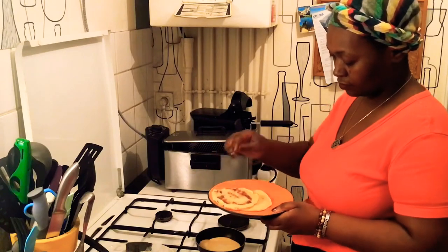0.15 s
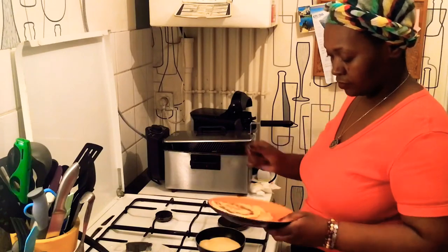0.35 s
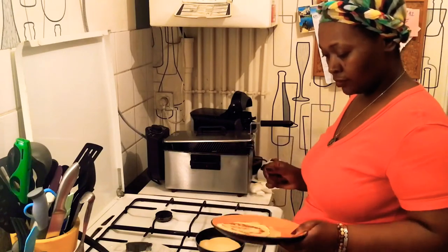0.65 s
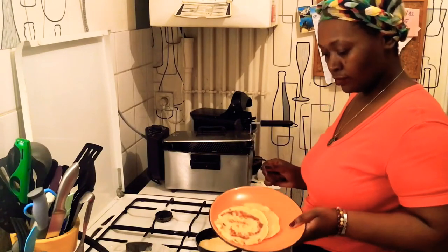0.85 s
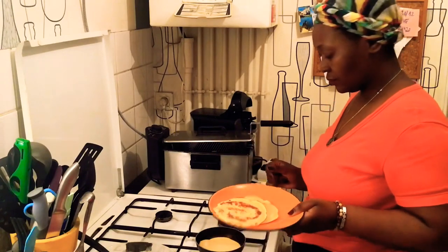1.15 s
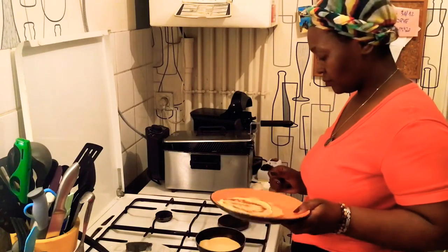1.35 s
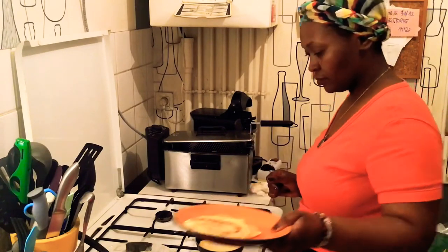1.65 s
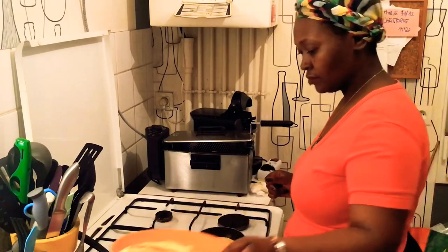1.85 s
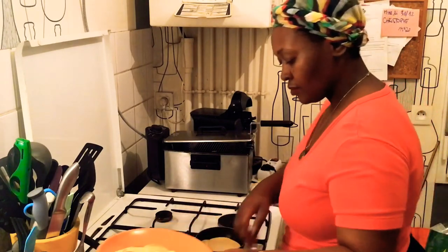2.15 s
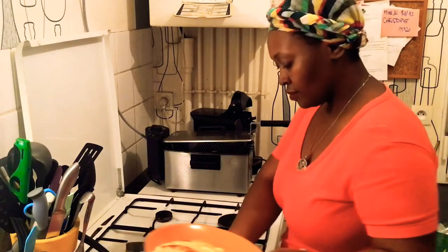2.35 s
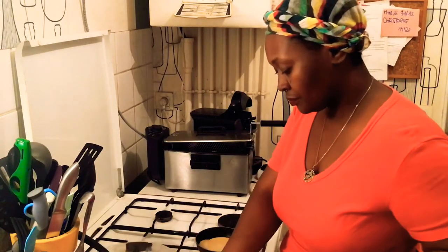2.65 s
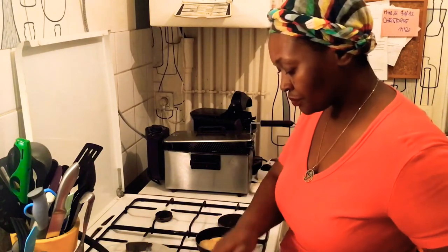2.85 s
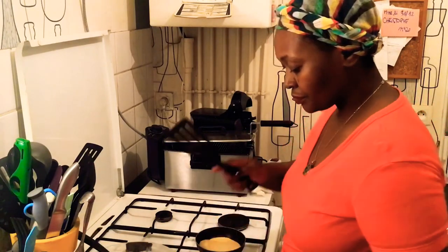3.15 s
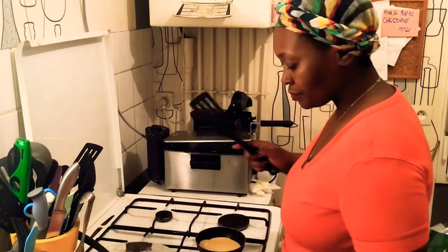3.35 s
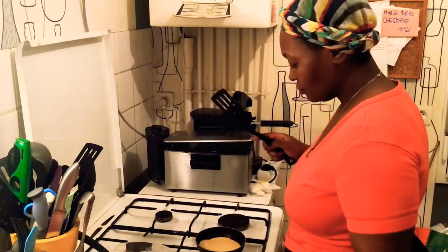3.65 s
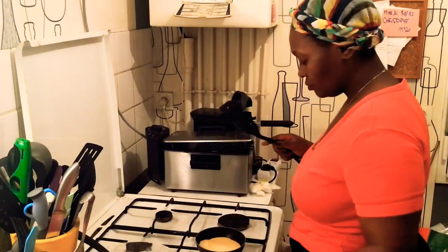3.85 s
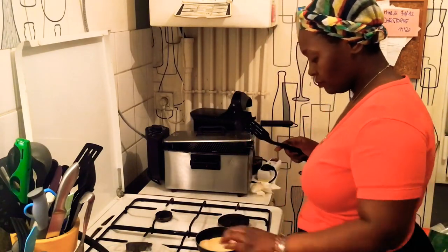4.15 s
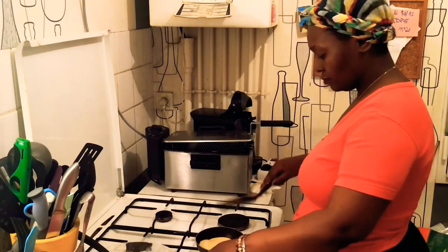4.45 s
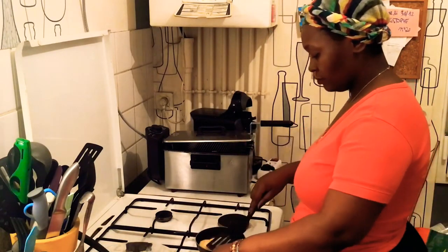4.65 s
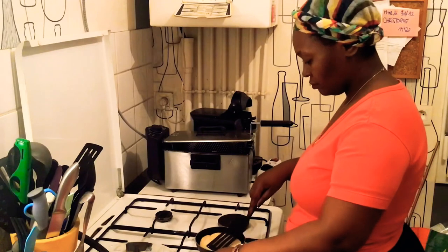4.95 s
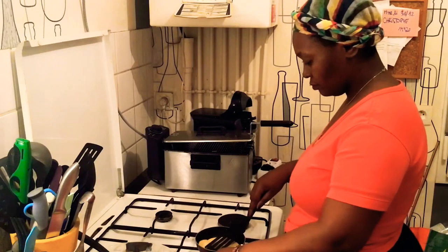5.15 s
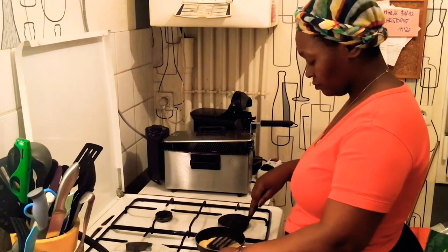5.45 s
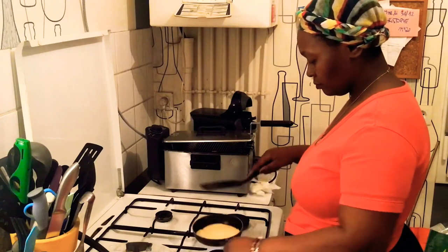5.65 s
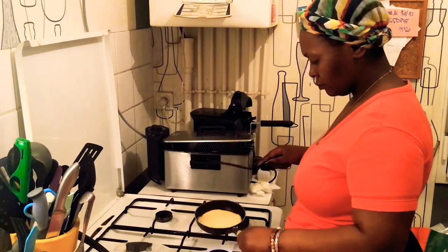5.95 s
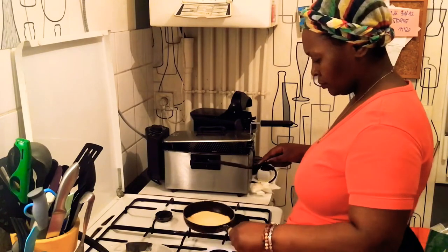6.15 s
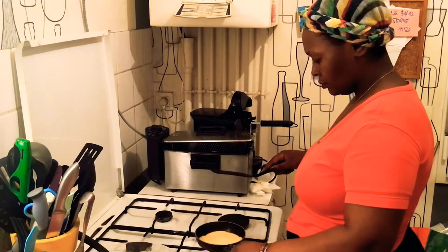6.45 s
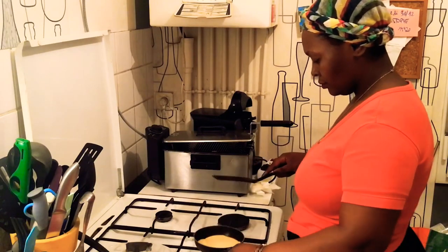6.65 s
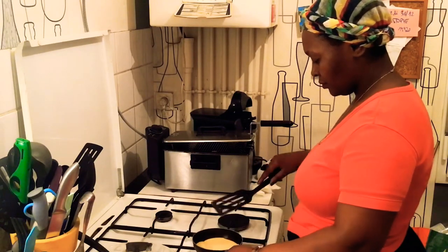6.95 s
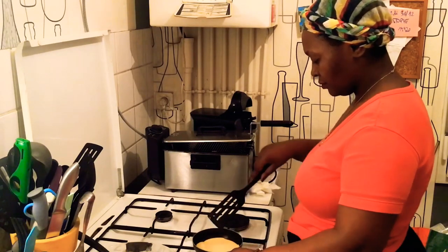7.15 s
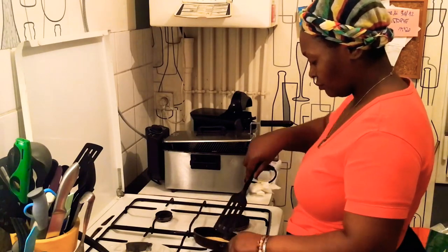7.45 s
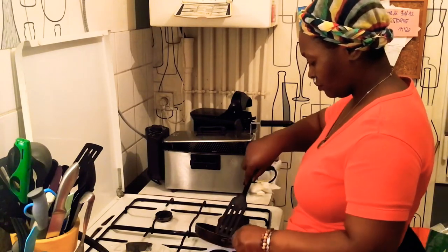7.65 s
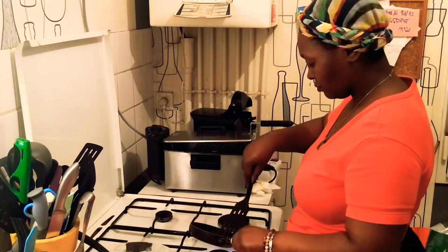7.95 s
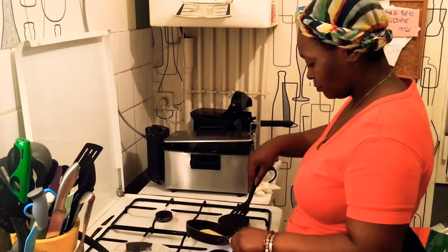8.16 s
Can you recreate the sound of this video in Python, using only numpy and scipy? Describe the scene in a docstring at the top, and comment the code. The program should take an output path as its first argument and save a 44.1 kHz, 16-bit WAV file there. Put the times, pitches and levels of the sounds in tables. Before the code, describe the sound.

Steady fan drone with soft airflow, faint sleeve rustles and tiny ticks, then dull plastic knocks and a single loud metallic clank on the hob.

```python
"""A small tiled kitchen: an extractor fan hums over a gas hob while someone makes pancakes.
The motor's magnetic pull, swayed by each turn of the rotor, gives a cluster of low tones over rushing air.
Sleeves brush, bracelets tick, a light piece of metal rings and soft bumps swell in the room: shaped noise
and fading tones. A plastic spatula knocks dully in the pan, and the pan is set down with one sharp clink,
heard as a crowd of ringing modes and a dense clank."""
import sys
import numpy as np
from scipy import signal
from scipy.fft import rfft, irfft
from scipy.io import wavfile
from scipy.ndimage import uniform_filter1d

SR = 44100
rng = np.random.default_rng(int(sys.argv[2]) if len(sys.argv) > 2 else 0)


def int16_out(signal):
    """Quantize to a 16-bit WAV file."""
    q = np.round(np.clip(np.atleast_2d(signal).T, -1, 1) * 32767)
    wavfile.write(sys.argv[1], SR, q.astype(np.int16))


N = 365588
TIME = np.arange(N) / SR  # the whole scene, s
RING = np.arange(SR) / SR  # one second for each struck sound, s


def undb(db):
    """Decibels to gain."""
    return 10 ** (np.asarray(db) / 20)


def unit(x):
    """Scale to an rms of 1."""
    return x / np.sqrt(np.mean(x ** 2))


def colour(x, points):
    """Filter by a spectrum of (pitch_hz, level_db) points, joined along log frequency."""
    point_hz, point_db = np.transpose(points)
    bin_hz = np.maximum(np.fft.rfftfreq(len(x), 1 / SR), 1)
    gain = undb(np.interp(np.log(bin_hz), np.log(point_hz), point_db))
    return irfft(rfft(x) * gain, len(x))


def walk(rate_hz):
    """Slow random drift: levels held for 1 / rate_hz seconds, slewed twice, with an rms of 1."""
    hold = int(SR / rate_hz)
    steps = np.repeat(rng.standard_normal(N // hold + 1), hold)
    slewed = uniform_filter1d(uniform_filter1d(steps, hold), hold)
    return unit(slewed[:N])


def soften(x, cutoff_hz, order):
    """Low-pass: a softer contact pushes for longer and excites less treble."""
    sos = signal.butter(order, min(cutoff_hz, .45 * SR), fs=SR, output="sos")
    return signal.sosfilt(sos, x)


def zero_phase_low(x, cutoff_hz):
    """The part of a sound below a cut-off, without delay, so that it can be subtracted cleanly."""
    return signal.sosfiltfilt(signal.butter(2, cutoff_hz, fs=SR, output="sos"), x)


def fade(t60_s):
    """Exponential decay over one second, falling 60 dB per t60_s."""
    return undb(-60 * RING / t60_s)


def ring(modes):
    """Sum of damped modes; each reaches the microphone with its own phase."""
    out = np.zeros(SR)
    for pitch_hz, level_db, t60_s in modes:
        tone = np.sin(2 * np.pi * (pitch_hz * RING + rng.random()))
        out += undb(level_db) * fade(t60_s) * tone
    return out


def add(track, start_s, sound):
    """Mix a sound into the track at its start time."""
    i = int(start_s * SR)
    track[i:i + len(sound)] += sound[:N - i]


def motor(drone_db=-0.08, throb_db=1.0, shiver_db=0.8, flutter_db=1.5, wobble_hz=0.1502):
    """Magnetic pull at twice the mains rate, with sidebands one rotor turn apart; the loudest throbs."""
    mains_pull_hz, drone_sideband = 100, 3
    # the quieter tones: pull_multiple, rotor_sideband
    sidebands = [(1, -1), (1, 0), (1, 1), (1, 2), (1, 4), (2, 1)]
    # middle level of each of those tones: level_db
    sideband_db = [-45.5, -63, -38.5, -49.5, -50, -49.5]
    # the loudest tone follows the rotor as its speed wanders: time_s, pitch_hz (before the wobble)
    drone_pitch = [(0.0, 165.8), (0.38, 163.4), (1.43, 166.2), (1.86, 162.7), (2.63, 166), (2.8, 163.1),
                   (3.25, 166.9), (3.63, 163.7), (3.76, 166.2), (4.36, 163.4), (4.57, 166.2), (4.74, 162.9),
                   (5.16, 166.9), (5.36, 163.5), (5.79, 166.7), (6.05, 163.4), (7.41, 165.3), (8.29, 165.0)]
    # slow swells of that tone: time_s, level_db (before the trim and drift)
    drone_level = [(0.0, -29.9), (1.81, -31), (2.08, -27.5), (2.79, -32.5), (2.95, -30), (4.08, -31.5),
                   (4.4, -26.5), (4.57, -32.5), (4.87, -27.5), (5.08, -31.4), (5.71, -29.5), (5.88, -33.5),
                   (6.18, -27.5), (6.6, -31), (6.77, -26.5), (7.03, -31), (8.16, -30), (8.29, -38)]

    pitch_hz = np.interp(TIME, *np.transpose(drone_pitch))
    rotor_hz = (pitch_hz - mains_pull_hz) / drone_sideband + wobble_hz * walk(8)
    turns = np.cumsum(rotor_hz) / SR  # shared, so that all sidebands keep step with the rotor

    def tone(pull, sideband):
        """One sideband of a multiple of the pull, at an rms of 1."""
        return np.sqrt(2) * np.sin(2 * np.pi * (pull * mains_pull_hz * TIME + sideband * turns))

    swell_db = np.interp(TIME, *np.transpose(drone_level))
    drift_db = throb_db * walk(8) + shiver_db * walk(22)
    out = undb(swell_db + drone_db + drift_db) * tone(1, drone_sideband)
    for (pull, sideband), level_db in zip(sidebands, sideband_db):
        out = out + undb(level_db + flutter_db * walk(5)) * tone(pull, sideband)
    return out


def air(swell_db=0.36, flicker_db=.5):
    """Turbulence booms in the duct and thins out into the hiss of fan and burner."""
    # the boom of hood and duct: pitch_hz, level_db (per Hz)
    rumble = [(25, -99), (38, -91), (50, -75), (60, -64.5), (72, -68), (100, -66.5), (116, -64),
              (140, -61.5), (178, -60.5), (200, -60.5), (235, -62), (275, -71), (308, -60.5), (345, -77)]
    # the rush above it: pitch_hz, level_db (per Hz)
    rush = [(345, -77), (410, -74.5), (520, -79), (650, -82.5), (820, -87.5), (900, -84.5), (1080, -93.5),
            (1320, -90), (1700, -96), (2150, -93.5), (3000, -101)]
    # the hiss on top: pitch_hz, level_db (per Hz)
    hiss = [(3000, -101), (4100, -102.5), (5500, -100.5), (6600, -109), (7350, -104), (7900, -109),
            (8600, -106), (10200, -111), (15500, -113)]
    white = rng.standard_normal(N) * np.sqrt(SR / 2)  # unit power in each Hz
    flow = colour(white, rumble + rush[1:] + hiss[1:])  # each band starts where the last one ends
    return flow * undb(swell_db * walk(4.17) + flicker_db * walk(18))


def rustle(grain_db=2, swell_power=3):
    """Cloth rubs in uneven little slips; each movement swells, holds briefly and dies away."""
    # sleeves brush as the cook turns and reaches: middle_s, length_s, level_db
    movements = [(.25, .45, -65), (2.047, .15, -62), (2.195, 0.19, -59), (2.6, .22, -64), (3.0, 0.29, -63),
                 (3.53, 0.26, -61), (4.16, 0.089, -64), (4.9, 0.29, -65), (5.97, .11, -59),
                 (6.18, 0.097, -62.5), (8.22, .4, -64)]
    cloth = [(500, -15.5), (2000, -0.5), (3400, 2), (4800, 0), (7000, -4.5), (10000, -11), (15500, -21)]
    rub = unit(colour(rng.standard_normal(N), cloth))
    envelope = np.zeros(N)
    for middle_s, length_s, level_db in movements:
        distance = np.abs(2 * (TIME - middle_s) / length_s)
        envelope += undb(level_db) / (1 + distance ** swell_power)
    return rub * envelope * undb(grain_db * walk(76))


def reflect(x, share, count=14):
    """Early echoes off hood and tiles comb the spectrum above the bass."""
    upper = x - zero_phase_low(x, 400)
    echoes = np.zeros(N)
    for lag_s in rng.uniform(.002, .03, count):
        echoes += rng.choice([-1, 1]) * np.roll(upper, int(lag_s * SR))
    combed = (upper + share * echoes / np.sqrt(count)) / np.hypot(1, share)  # about the same power
    return x - upper + combed


def ticks(tick_db=-55, t60_s=0.31, snap_t60_s=0.027):
    """Tiny hard contacts: a bright snap, a lower clack and a short tail off the tiles."""
    # bracelets and utensil: start_s, level_db (relative), clack_db (share of the lower clack)
    contacts = [(1.4314, -13, -10), (1.857, -7, -4), (2.5092, -9, -8), (2.6098, -1.5, -3),
                (2.9947, -7, -11), (3.0436, -4, -10), (3.489, -8, -2), (3.527, -7, -6), (4.2646, 0, -11),
                (4.573, -22, 5), (4.74, -20, 6), (4.9254, -6, 4.5), (5.0032, -10.5, 0), (5.9373, -13, 2),
                (6.165, -13, -6)]
    bright_points = [(1500, -16), (5000, -4), (8000, 2), (12000, 1), (15500, 2)]
    clack_points = [(1500, -12), (3500, 9.0), (5200, 11), (7000, -19), (12000, -30)]
    out = np.zeros(N)
    for start_s, level_db, clack_db in contacts:
        bright = colour(rng.standard_normal(SR), bright_points)
        clack = colour(rng.standard_normal(SR), clack_points)
        decay = fade(t60_s) + fade(snap_t60_s)
        add(out, start_s, undb(tick_db + level_db) * (bright + undb(clack_db) * clack) * decay)
    return out


def bumps(room_hz=61, t60_s=0.57, rise_s=0.019):
    """Soft bumps swell in a low resonance of the room."""
    # soft low bumps: start_s, level_db (relative)
    soft_bumps = [(2.58, -40), (3.44, -37), (5.47, -42), (6.77, -35.5), (7.09, -41)]
    rise = 1 - np.exp(-RING / rise_s)
    out = np.zeros(N)
    for start_s, level_db in soft_bumps:
        add(out, start_s, 2 * ring([(room_hz, level_db, t60_s)]) * rise)
    return out


def ting(start_s=3.45, rise_s=0.13, flutter_db=3):
    """A light piece of metal is jostled into ringing, and flutters as the hand moves."""
    # it rings as the spatula is raised: pitch_hz, level_db (before swell and flutter), t60_s
    metal_modes = [(3203, -58, 1.0), (4511, -55, .9), (5717, -58, .4), (7660, -63, .9)]
    out = np.zeros(N)
    swell = 1 - np.exp(-(RING / rise_s) ** 2)
    for mode in metal_modes:
        flutter = undb(flutter_db * walk(39.04)[:SR])  # each mode flutters on its own
        add(out, start_s, ring([mode]) * swell * flutter)
    return out


def knocks(body_db=-37, modes_db=-44, t60_s=.38, snap_t60_s=0.094, push_s=0.0024):
    """Soft plastic pushes on the pan: a brief thud, a short ring and the room's tail."""
    # dull knocks of the spatula in the pan: start_s, level_db (relative), contact_cutoff_hz
    pushes = [(5.413, 0, 6000), (5.432, -3.5, 4000), (5.456, -5.5, 2800), (5.485, -11, 2001),
              (6.997, -4.5, 1400), (7.028, -10, 1300), (7.082, 0, 1330), (7.133, -12, 1201),
              (7.6892, -2.5, 1202), (7.735, -5.5, 1150), (8.169, -10.5, 1193)]
    # body of the knocks: pitch_hz, level_db (relative)
    body_points = [(150, -18), (400, 8), (600, 3.5), (760, 3.5), (950, -0.5), (1270, 5.5), (1420, -1),
                   (1560, 1.5), (1750, -7), (2250, -2), (2650, -13.5), (3350, -6.5), (4400, -17.5),
                   (8000, -42)]
    # their short ring: pitch_hz, level_db (relative), t60_s
    short_modes = [(420, -4, .35), (684, -5, .35), (770, -3, .15), (1040, -6, .25), (1265, 1, .25),
                   (1530, -4, .4)]
    onset = 1 - np.exp(-RING / push_s)
    out = np.zeros(N)
    for start_s, level_db, contact_hz in pushes:
        body = colour(rng.standard_normal(SR), body_points) * (fade(t60_s) + fade(snap_t60_s))
        knock = (undb(body_db) * body + undb(modes_db) * ring(short_modes)) * onset
        add(out, start_s, undb(level_db) * soften(knock, contact_hz, order=4))
    return out


def pan(modes_db=-22, clank_db=-20, low_t60_s=0.46, high_t60_s=0.21, split_hz=4300, boom_rise_s=0.0079):
    """Each blow rings the pan's modes and a dense clank that the tiled walls prolong."""
    # the pan lands and settles: start_s, level_db (relative), contact_cutoff_hz
    blows = [(6.7074, -0.5, 11980), (6.716, -6.5, 4970)]
    # ringing of the pan on the grate: pitch_hz, level_db (relative), t60_s
    grate_modes = [(222, -13, .8), (315, -5, .7), (684, -22, .37), (1095, -19, .3), (1333, -16, .45),
                   (1448, -22, .31), (1783, -18, .33), (1873, -21, .27), (2244, -15, .33), (2353, -19, .25),
                   (2754, -12, .28), (3029, -14, .28), (3095, -17, .3), (3411, -17, .3), (3456, -16, .3),
                   (3578, -10, .26), (3747, -21, .45), (3916, -11, .32), (3968, -13, .4), (4102, -17, .28),
                   (4247, -19, .2), (4737, -16, .34), (4804, -14, .34), (5030, -14, .2), (5265, -21, .21),
                   (6272, -14, .19), (6342, -15, .18), (7030, -23, .17), (8398, -26, .2), (8560, -27, .2)]
    # dense, quickly fading resonances of pan and hob: pitch_hz, level_db (relative)
    clank_points = [(150, -18), (230, 18), (340, 12), (430, 4), (900, -5), (1400, 0.5), (2200, -1),
                    (2600, -6), (3000, 2.5), (4100, 0), (4440, -6), (4780, 8.5), (5350, -12), (5850, -10),
                    (6250, 8.5), (6500, -15), (7100, -3), (7700, -22), (8450, -9), (9600, -25.5),
                    (13000, -19), (15500, -52)]
    out = np.zeros(N)
    for start_s, level_db, contact_hz in blows:
        dense = colour(rng.standard_normal(SR), clank_points)
        low = zero_phase_low(dense, split_hz)
        boom = zero_phase_low(dense, 600)
        # the hob's boom builds up later than the bright clink, and the treble dies first
        late_low = low - boom * np.exp(-RING / boom_rise_s)
        clank = late_low * fade(low_t60_s) + (dense - low) * fade(high_t60_s)
        blow = undb(clank_db) * clank + undb(modes_db) * ring(grate_modes)
        add(out, start_s, undb(level_db) * soften(blow, contact_hz, order=2))
    return out


def scene():
    """The fan, with the cooking sounds in front of it, at one microphone."""
    hiss = reflect(air() + rustle(), share=.35)
    cooking = ticks() + bumps() + ting() + knocks() + pan()
    return (motor() + hiss + cooking)[None]


def record(dry, top_hz=15800):
    """The recorder cuts the top with a steep low-pass."""
    return signal.sosfilt(signal.ellip(10, .1, 80, top_hz, fs=SR, output="sos"), dry)


dry = scene()
out = record(dry)
int16_out(out)
```